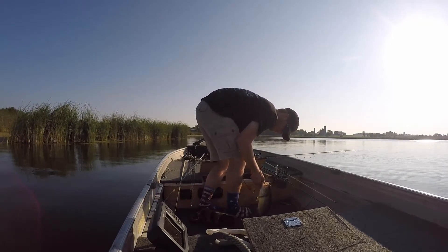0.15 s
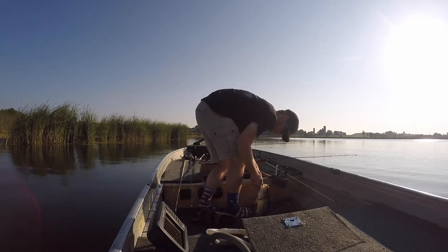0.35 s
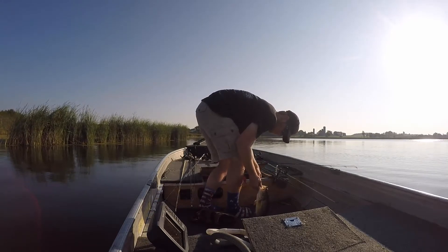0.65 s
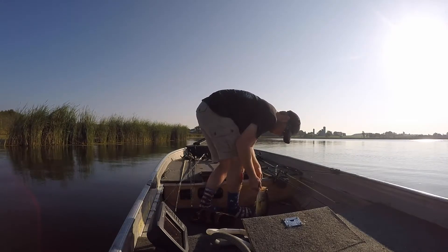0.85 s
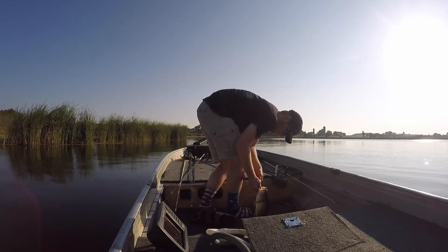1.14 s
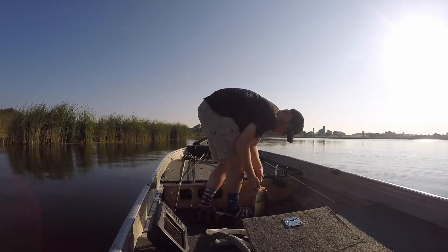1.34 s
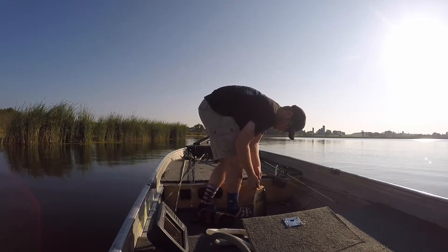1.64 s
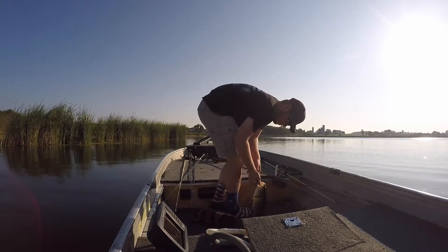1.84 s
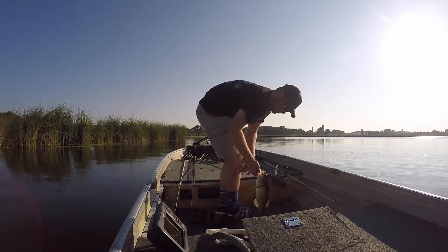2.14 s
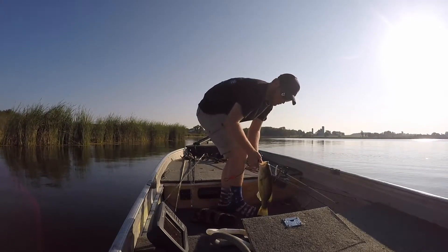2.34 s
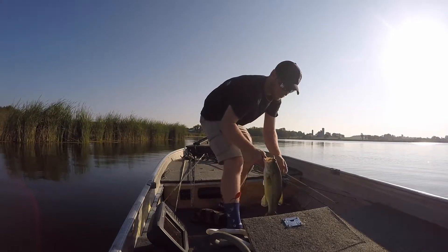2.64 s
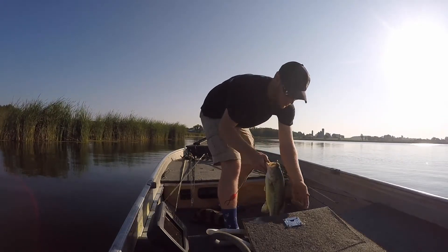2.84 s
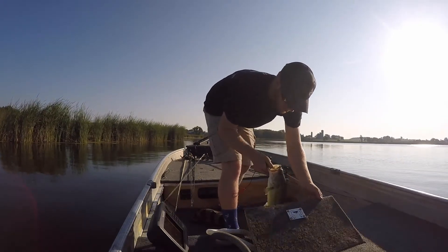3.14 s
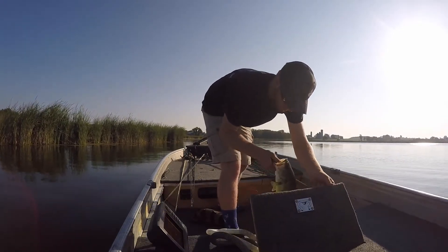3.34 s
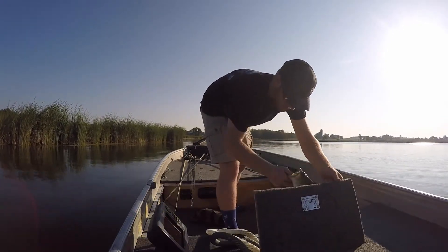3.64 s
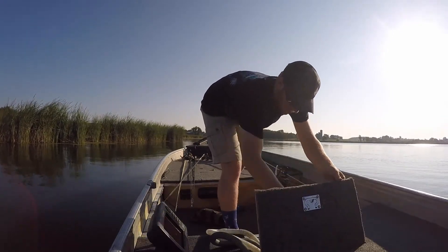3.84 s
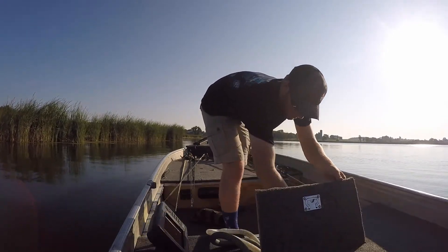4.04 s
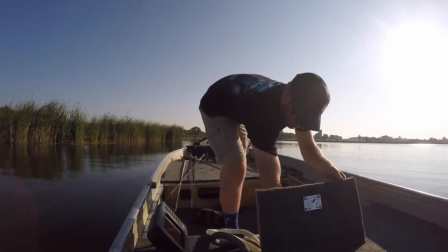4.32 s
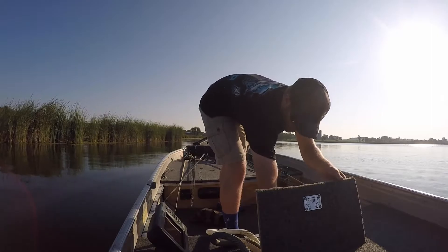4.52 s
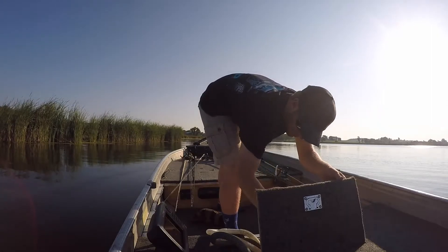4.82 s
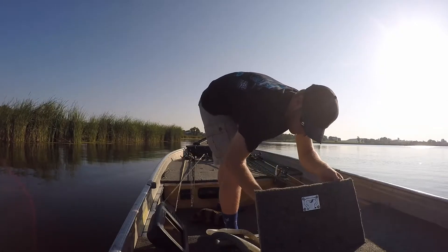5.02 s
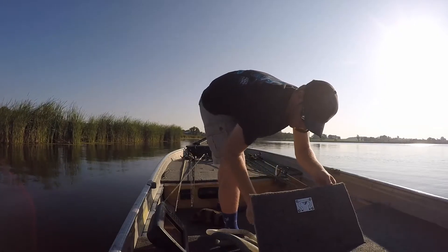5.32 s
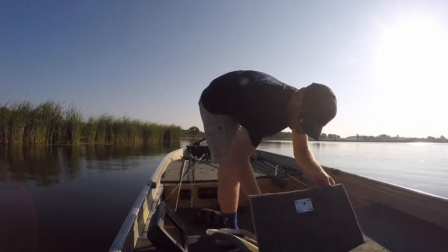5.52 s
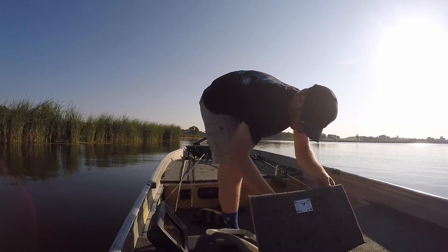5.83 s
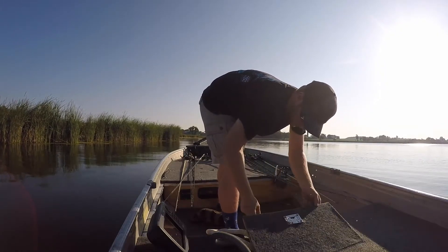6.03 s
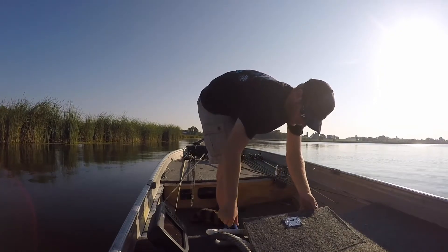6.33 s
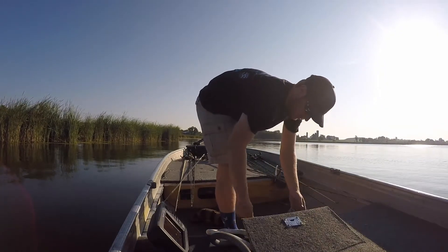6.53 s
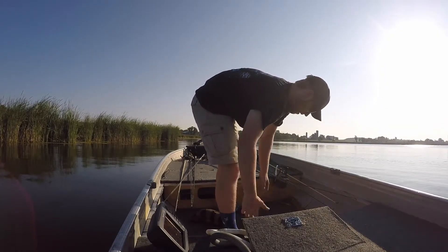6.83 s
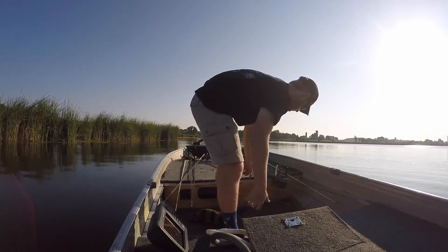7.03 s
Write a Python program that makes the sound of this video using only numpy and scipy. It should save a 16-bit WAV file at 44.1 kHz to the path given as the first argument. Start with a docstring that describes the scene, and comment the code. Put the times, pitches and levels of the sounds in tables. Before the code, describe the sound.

On board an aluminium boat on calm water, close and mono, with a low unsteady rocking rumble, soft open air, a faint low drone and slight rustling. At 1.0 s comes the loudest event: a hard bang with a bright metallic clack, ringing plates and a deep hull boom, then boards thudding back in quick weakening bounces and small ticks until about 1.3 s. It stays quiet until 2.8 s, with faint touches, then dull booming bumps at 3.0 s as the hatch is lifted, and a watery plop at 3.25 s. From 3.9 to 5.3 s: rustles, faint taps, tiny bubbles. At 5.7 s, plops and a brief rough hinge groan, dipping then gliding up until 6.0 s. The hatch drops at 6.1 s with a heavy, duller slam, bouncing boards and coarse scraping to about 6.5 s; soft knocks, a plop at 6.77 s and rustling finish by 7.2 s.

```python
"""Heavy blows bang and bounce on the floor of an aluminium boat on calm water, close by and in mono: each clacks,
rings the plates and booms in the hull, as sums of decaying modes and noise bursts; slams set deck boards thudding.
A deck hatch is lifted, groans on its hinge (a gliding tone), scrapes (shifting noise) and drops shut.
Small parts tick; water plops in the well below (rising sines). Behind lie the low rumble of the rocking boat,
soft open air, a faint drone, and the rustle and small drips of movement on deck."""
import sys
import numpy as np
from scipy import signal
from scipy.fft import rfft, irfft, next_fast_len
from scipy.io import wavfile
from scipy.ndimage import uniform_filter1d, map_coordinates

SR = 44100
rng = np.random.default_rng(int(sys.argv[2]) if len(sys.argv) > 2 else 0)


def unload_wav(signal):
    """Save mono or channel-first audio to the path in sys.argv[1] as 16-bit WAV at rate SR, clipped to [-1, 1]."""
    wavfile.write(
        sys.argv[1],
        SR,
        np.round(np.clip(np.atleast_2d(signal).T, -1, 1) * 32767).astype(np.int16),
    )


N = 316197
TIME = np.arange(N) / SR  # s, whole scene
AGE = np.arange(SR * 3 // 4) / SR  # s, since the start of one sound

# All levels are relative: each layer adds its own trim where it is mixed.
# Noise spectra of the background: [f/Hz, level/dB per Hz]
RUMBLE_SPECTRUM = [(8.8, -36), (15, 1.5), (32, 4), (51, 0), (78, -6), (135, -15), (156, -23), (177, -31.5),
                   (215, -34.5), (260, -33), (340, -53), (570, -120)]
AIR_SPECTRUM = [(120, -48), (200, 1), (300, -7), (400, -4.5), (480, -10), (620, -1.5), (700, -8.5),
                (850, 1.5), (980, -12), (1750, -21.5), (4000, -21), (8000, -29.5), (13000, -35),
                (15500, -41)]
# Resonances of the steady drone: [f/Hz, width/Hz, level/dB]
DRONE_PEAKS = [(137, 37, 18), (378, 25, 11), (584, 32, -11), (826, 10, 3.5), (930, 8.9, -21)]
# Rumble as the boat rocks: [t/s, level/dB]
ROCKING_CURVE = [(0.0, -36), (0.16, -32), (0.5, -41.5), (0.78, -34.5), (0.9, -40), (1.2, -30), (1.8, -45.5),
                 (2.12, -49.5), (3.22, -35.5), (4.27, -49), (4.61, -44.5), (5.95, -43), (6.19, -38.5),
                 (6.83, -34), (6.95, -41), (7.17, -40)]
# Movement on deck: [t/s, rustle level/dB, scrape level/dB]
MOVEMENT_CURVE = [(0, -71, -62), (.95, -64.5, -57.5), (1.6, -67, -62), (2, -62.5, -60.5), (2.5, -66.5, -61),
                  (2.8, -59.5, -55.5), (3.2, -60.5, -55), (3.5, -72, -58.5), (3.9, -57.5, -61),
                  (4.65, -66, -61), (4.9, -55, -59.5), (5.15, -66.5, -57), (5.62, -64, -59),
                  (5.78, -56.5, -55.5), (6.07, -50.5, -39.5), (6.22, -45.5, -40.5), (6.48, -57, -48.5),
                  (6.7, -51, -49.5), (7.17, -55, -50.5)]
# Noise spectra of cloth and shoes, and of rubbing on the deck: [f/Hz, level/dB per Hz]
RUSTLE_SPECTRUM = [(650, -40), (1200, 10), (1800, 1), (3600, -1), (5500, -7), (8000, -15), (11000, -20.5),
                   (15500, -27)]
SCRAPE_SPECTRUM = [(76, -12.5), (130, -3), (254, -11), (345, -8.5), (459, -16.5), (513, -12), (610, -16),
                   (874, -13.5), (989, -16.5), (2500, -31.5), (3250, -81), (5500, -120)]
# Strength of small bubbles by pitch: [f/Hz, level/dB]
DRIP_STRENGTH = [(300, 0), (700, -13), (1500, 2), (3200, 10), (5000, -9), (9000, -8)]
# Loudest bubbles and drips in the well and along the hull: [t/s, starting f/Hz, level/dB]
PLOP_EVENTS = [(3.255, 634, -34.5), (3.257, 1294, -39), (3.957, 2520, -41), (3.966, 837, -32.5),
               (4.248, 4470, -35), (4.251, 339, -30), (4.496, 2650, -42.5), (4.834, 178, -37),
               (4.996, 366, -37.5), (5.234, 3100, -42), (5.7, 324, -24), (5.701, 2280, -32),
               (5.727, 2640, -40), (6.556, 528, -36.5), (6.658, 880, -38), (6.768, 1197, -29.5),
               (7.064, 542, -37)]
# Hinge groan as the hatch is lowered: [t/s, mean f/Hz, level/dB]
GROAN_CURVE = [(5.71, 289.6, -64), (5.735, 249, -42), (5.765, 236, -39), (5.80, 303, -56), (5.85, 303, -47),
               (5.885, 333, -40.5), (5.935, 415, -58), (5.96, 555, -44), (5.985, 566, -67)]
# Light ticks of loose tackle and the latch: [t/s, level/dB]
TICK_EVENTS = [(0.9942, -42), (1.057, -36), (1.087, -36), (1.124, -41), (1.321, -52.5), (1.349, -47.5),
               (1.3751, -47), (1.428, -48.5), (1.769, -52), (2.628, -54.5), (4.896, -47), (5.234, -51),
               (6.1195, -28), (6.72, -39.5)]
# Noise spectra of a tick, and of a blow's clack, first touch, knock and thump: [f/Hz, level/dB per Hz]
TICK_SPECTRUM = [(600, -24), (2000, -3.5), (3500, 0.5), (5500, -3), (8000, -10), (11000, -17), (15500, -27)]
CLACK_SPECTRUM = [(300, -49), (900, -8), (1600, 1), (2500, -5), (4200, 1), (5500, -11.5), (7500, -21),
                  (11000, -54.5), (15500, -38)]
CRACK_SPECTRUM = [(700, -19), (1600, -13), (2800, 14), (4000, -6), (5200, -8), (7000, -18), (10000, -46),
                  (15500, -38)]
KNOCK_SPECTRUM = [(200, -29), (380, 0), (560, 4.5), (700, 4.5), (830, 6.5), (1080, 0.5), (1400, -4.5),
                  (3000, -8), (8000, -65)]
THUMP_SPECTRUM = [(60, -21), (120, 6), (180, 3.5), (260, -3.5), (350, -7), (500, -13.5), (1500, -54)]
# Ringing modes of the metal fittings, plates and hollow hull: [f/Hz, level/dB, t60/s]
FITTING_MODES = [(1483, 7, 0.11), (1780, -1, .18), (1938, 5, 0.11), (2287, -19, 0.3), (2510, 9, 0.057),
                 (2750, -1, 0.23), (3100, -7.5, 0.11), (3280, 8, 0.084), (4030, -34, 0.16),
                 (4240, -47, 0.059), (4680, -5, 0.15), (4700, -13, 0.41), (5170, -3, 0.18),
                 (5880, -9, 0.25)]
PLATE_MODES = [(235.2, 3.5, 0.25), (282, -6.5, 0.62), (352.5, 3.5, 0.22), (416, -14, 0.59),
               (522.5, -5, 0.36), (545, -4, 0.27), (632, -8, 0.38), (816, -2, 0.19), (923, -11, 0.51),
               (1075, 4.5, 0.092), (1083, -6, 0.1), (1189, -2, 0.13)]
HULL_MODES = [(38.7, -1.5, 0.12), (71.6, -2, 0.21), (80.9, -1.5, 0.35), (105, -9.5, 0.13),
              (118.7, -20, 0.25), (177, -7.5, 0.51)]
# Harder contact booms higher: [clack level over boom/dB, boom centre f/Hz]
CONTACT_HARDNESS = [(-27, 46), (-7, 76), (8, 220)]
# Blows on the hull: [t/s, metal clack/dB, plate knock/dB, floor thump/dB, hull boom/dB]
BLOW_EVENTS = [(1.014, -22, -29, -33, -9.5), (1.0211, -13, -18.5, -12.5, -1.5),
               (1.0548, -40, -51, -19, -20), (1.0713, -52, -44, -34, -7), (1.0859, -41, -40, -37, -34),
               (1.1362, -32.5, -58, -33, -22), (1.1799, -33.5, -38, -28.5, -29),
               (1.736, -43, -48, -51, -60), (2.797, -40, -46.5, -48, -55), (2.897, -60, -53, -67, -41),
               (3.0097, -35, -38.5, -50, -14.5), (3.0263, -31, -34.5, -32.5, -13),
               (3.053, -36.5, -48, -36, -20), (3.256, -55, -49.5, -40, -51),
               (3.3026, -47.5, -49.5, -58, -41), (3.352, -56, -67, -58, -17),
               (3.9585, -44.5, -52, -60, -59), (4.016, -41.5, -46.5, -67, -54),
               (4.249, -42, -45, -43.5, -52), (4.7628, -42, -54, -60, -62), (5.699, -40.5, -44, -43, -51),
               (5.7301, -37.5, -62, -54, -42), (5.874, -40, -65, -55, -58), (6.0741, -36, -39, -31, -34),
               (6.1019, -34, -25.5, -29, -26), (6.12, -23, -18.5, -18.5, -2.5),
               (6.2036, -31, -32, -36, -26), (6.2737, -42.5, -35, -34, -16), (6.588, -51, -41, -36, -29),
               (6.652, -45, -52, -36.5, -26), (6.7226, -30.5, -33.5, -38, -40),
               (6.835, -58, -40.5, -28.5, -20.5), (7.0917, -66, -47.5, -40, -41)]

TOP_HZ = 15600
RUMBLE_DB = 4  # over the rocking curve
PLOP_T60_S, PLOP_SIZE_LAW = .066, .55  # ring time at 1 kHz; bigger bubbles ring longer by this power
PLOP_RISE, PLOP_JITTER = 3.6, 0.074  # octaves per second, octaves
PLOP_DIRECT_DB, PLOP_WALLS_DB = -0.5, -6  # straight from the water, off the walls of the well
GROAN_ROUGH, GROAN_OVERTONE_DB = 0.013, -28  # pitch unsteadiness (share), second harmonic
TACKLE_DB, TACKLE_TOP_DB = -7.5, -27  # tackle tick relative to the clack, its upper limit before tick trim
SLAM_DB = -22  # a knock above this makes the deck boards jump
JUMP_S, JUMP_HZ = .024, 130  # mean spacing, boom centre
JUMP_DB, JUMP_LOSS_DB = -10, 2  # first thud relative to the blow's thump, loss per jump


def amp(db):
    """Decibels to gain."""
    return 10 ** (np.asarray(db) / 20)


def unit(x):
    """Scale to rms 1."""
    return x / np.sqrt(np.mean(x ** 2) + 1e-20)


def fade(t60):
    """Exponential decay, 60 dB down after t60 seconds."""
    return np.exp(-np.log(1000) * AGE / max(t60, 1e-3))


def curves(rows):
    """One value per sample for each column after the time."""
    s, *columns = np.transpose(rows)
    return [np.interp(TIME, s, column) for column in columns]


def wobble(rate):
    """A smooth random curve, rate knots a second."""
    knots = rng.standard_normal(int(N * rate / SR) + 4)
    return map_coordinates(knots, [TIME * rate])


def filtered(x, response):
    """x times a complex response of frequency."""
    size = next_fast_len(len(x) + 8192)
    spectrum = rfft(x, size) * response(np.fft.rfftfreq(size, 1 / SR))
    return irfft(spectrum, size)[:len(x)]


def coloured(x, spectrum):
    """x shaped by a [f/Hz, level/dB] spectrum, at rms 1."""
    f, db = np.transpose(spectrum)
    return unit(filtered(x, lambda hz: amp(np.interp(np.log(hz + 1), np.log(f), db))))


def add(track, s, sound):
    """Mix a sound in at time s."""
    room = track[round(s * SR):][:len(sound)]
    room += sound[:len(room)]


def background():
    """The rocking hull rumbles under soft open air and a faint drone of broad resonances."""
    rumble_db = curves(ROCKING_CURVE)[0] + RUMBLE_DB + 1.6 * wobble(4)
    rumble = coloured(rng.standard_normal(N), RUMBLE_SPECTRUM) * amp(rumble_db)
    air = amp(-57) * coloured(rng.standard_normal(N), AIR_SPECTRUM)

    def resonances(f):
        """Sum of the drone's band-pass peaks."""
        return sum(amp(db) * 1j * f * width / (centre ** 2 - f * f + 1j * f * width)
                   for centre, width, db in DRONE_PEAKS)

    drone = amp(-59.0) * unit(filtered(rng.standard_normal(N), resonances))
    return rumble + air + drone


def drips(loudness_db, per_second, size_db):
    """Stirred water pops small bubbles at random pitches that rise; small ones ring briefly."""
    track = np.zeros(N)
    age = AGE[:SR // 10]
    pitch_hz, pitch_db = np.transpose(DRIP_STRENGTH)
    for when, pitch, size, life in rng.random((round(per_second * N / SR), 4)):
        hz = 400 * 20 ** (pitch ** .7)
        strength_db = np.interp(np.log(hz), np.log(pitch_hz), pitch_db)
        db = loudness_db[int(when * N)] + size_db * size ** 3 + strength_db
        decay = 0.0029 * (.5 + life) * np.sqrt(2000 / hz)
        tone = np.sin(2 * np.pi * hz * age * (1 + 0.98 * life * age))
        shape = np.exp(-age / decay) * (1 - np.exp(-age / 0.0023))
        add(track, when * N / SR, amp(db) * tone * shape)
    return track


def patchy(depth_db):
    """Noise whose colour shifts from moment to moment, as the rubbing contact moves."""
    z = signal.stft(rng.standard_normal(N), nperseg=512)[2]
    field = uniform_filter1d(rng.standard_normal(z.shape), size=5, axis=0)  # smooth over frequency
    field = uniform_filter1d(field, size=4, axis=1)  # and over time
    return signal.istft(z * amp(depth_db * unit(field)), nperseg=512)[1][:N]


def scuffs():
    """Cloth and grit catch and slip in brief scratches, each with its own colour."""
    track = np.zeros(N)
    age = AGE[:SR // 16]
    for when, pitch, size, life in rng.random((round(55 * N / SR), 4)):  # 55 a second
        hz = 1500 * 5 ** pitch
        scratch = signal.lfilter(*signal.iirpeak(hz, 3.5, fs=SR), rng.standard_normal(len(age)))
        slip = age / (.002 + .005 * life)
        add(track, when * N / SR, amp(6 * size ** 2) * scratch * slip * np.exp(-slip))
    return unit(track)


def movement():
    """Clothes rustle, shoes and the carpeted hatch rub on the deck, and the moving boat stirs the water."""
    rustle_db, scrape_db = curves(MOVEMENT_CURVE)
    share = np.interp(rustle_db, [-64, -54], [.6, .2])  # brisk rubbing blurs the scratches
    friction = np.sqrt(share) * scuffs() + np.sqrt(1 - share) * unit(patchy(depth_db=5.0))
    rustle = coloured(friction, RUSTLE_SPECTRUM) * amp(rustle_db - 0.5 + 0.8 * wobble(21))
    scrape = coloured(patchy(depth_db=4.0), SCRAPE_SPECTRUM) * amp(scrape_db + 2.0 + 0.94 * wobble(30))
    water = drips(np.minimum(rustle_db, -57) + 2, per_second=60, size_db=13)
    return rustle + scrape + water


def plops():
    """Trapped air rings in the water, its pitch rising; close walls blur each note."""
    track = np.zeros(N)
    for s, hz, db in PLOP_EVENTS:
        t60 = PLOP_T60_S * (1000 / hz) ** PLOP_SIZE_LAW
        jitter = np.interp(AGE, np.linspace(0, AGE[-1], num=260), rng.standard_normal(260))
        pitch = hz * 2 ** (PLOP_RISE * np.minimum(AGE, t60) + PLOP_JITTER * jitter)
        shape = fade(t60) * (1 - np.exp(-AGE / 0.0024))
        note = np.sin(2 * np.pi * np.cumsum(pitch) / SR) * shape
        walls = rng.standard_normal(len(AGE)) * fade(0.061)
        blur = signal.fftconvolve(note, walls / np.linalg.norm(walls))[:len(AGE)]
        add(track, s, amp(db) * (amp(PLOP_DIRECT_DB) * note + amp(PLOP_WALLS_DB) * blur))
    return track


def groan():
    """The hinge sticks and slips; the rough tone dips, then climbs as the hatch gathers speed."""
    hz, db = curves(GROAN_CURVE)
    phase = 2 * np.pi * np.cumsum(hz * (1 + GROAN_ROUGH * wobble(150))) / SR
    turning = (TIME > GROAN_CURVE[0][0]) & (TIME < GROAN_CURVE[-1][0])
    tone = np.sin(phase) + amp(GROAN_OVERTONE_DB) * np.sin(2 * phase)
    return turning * amp(db + 2.0 * wobble(68)) * tone


def burst(spectrum, attack, t60, tail_db, tail_t60):
    """Countless overlapping modes: a swell as waves spread, a fast decay, a weak tail from the rest of the boat."""
    shape = (1 - np.exp(-AGE / attack)) * (fade(t60) + amp(tail_db) * fade(tail_t60))
    sound = shape * coloured(rng.standard_normal(len(AGE)), spectrum)
    return sound * np.linalg.norm(shape) / np.linalg.norm(sound)  # the blow sets the energy


def ring(modes, scatter_db):
    """Distinct modes, whose strengths and signs depend on where the blow lands."""
    strength = amp(scatter_db * rng.standard_normal(len(modes))) * rng.choice([-1, 1], len(modes))
    swing = sum(gain * amp(db) * fade(t60) * np.sin(2 * np.pi * hz * AGE)
                for gain, (hz, db, t60) in zip(strength, modes))
    return swing * (1 - np.exp(-AGE / 0.0014))


def tick(db):
    """A small hard part clicks; stronger ticks chatter longer."""
    life = np.interp(db, [-55, -35], [.028, .055])
    click = burst(TICK_SPECTRUM, attack=0.00067, t60=life, tail_db=-16, tail_t60=3 * life)
    return amp(db + 0.5) * click


def ticks():
    """Small hard parts click, some alone and some along with a blow."""
    track = np.zeros(N)
    for s, db in TICK_EVENTS:
        add(track, s, tick(db))
    return track


def clack(clack_db):
    """Metal fittings chatter and ring after a sharp first touch; hard blows keep loose parts going longer."""
    rattle = np.interp(clack_db, [-45, -15], [.032, .075])
    chatter = burst(CLACK_SPECTRUM, attack=0.00094, t60=rattle, tail_db=-20.5, tail_t60=2.4 * rattle)
    fittings = amp(-18.5) * ring(FITTING_MODES, scatter_db=-0.5)
    touch = burst(CRACK_SPECTRUM, attack=0.00075, t60=0.012, tail_db=-33, tail_t60=.05)
    return chatter + fittings + amp(-0.5) * touch


def knock():
    """The plates of the hull ring, in distinct modes over a dense burst."""
    dense = burst(KNOCK_SPECTRUM, attack=0.00055, t60=0.12, tail_db=-32.0, tail_t60=0.31)
    return dense + amp(-9.5) * ring(PLATE_MODES, scatter_db=5.0)


def thump():
    """The dull answer of the floor."""
    return burst(THUMP_SPECTRUM, attack=0.0028, t60=0.16, tail_db=-27.0, tail_t60=0.72)


def boom(centre_hz, octaves):
    """A push on the hull favours the modes whose period matches its contact time."""
    swing = np.zeros(len(AGE))
    for hz, db, t60 in HULL_MODES:
        favour = 1 / (1 + (np.log2(hz / centre_hz) / octaves) ** 2)
        swing -= favour * amp(db) * fade(t60) * np.sin(2 * np.pi * hz * AGE)
    return swing * (1 - np.exp(-AGE / 0.0054))


def jumping_boards(count):
    """After a slam the loose deck boards thud back count times, unevenly and ever more weakly."""
    track = np.zeros(N)
    for s, _, knock_db, thump_db, _ in BLOW_EVENTS:
        if knock_db > SLAM_DB:
            for k, late in enumerate(rng.uniform(-0.3064, 0.295, count)):
                thud = thump() + amp(-13.5) * knock() + amp(-3.5) * boom(JUMP_HZ, octaves=0.83)
                thud_db = thump_db + JUMP_DB - JUMP_LOSS_DB * k
                add(track, s + JUMP_S * (k + 1 + late), amp(thud_db) * thud)
    return track


def blows():
    """Each contact clacks on metal, knocks and thumps through the plates and pushes the whole hull."""
    track = np.zeros(N)
    for s, clack_db, knock_db, thump_db, boom_db in BLOW_EVENTS:
        tackle = tick(min(clack_db + TACKLE_DB, TACKLE_TOP_DB))
        metal = amp(clack_db - 1.5) * clack(clack_db)
        add(track, s, metal + amp(knock_db) * knock() + amp(thump_db) * thump() + tackle)
        centre_hz = np.interp(clack_db - boom_db, *np.transpose(CONTACT_HARDNESS))
        hull = amp(boom_db) * boom(centre_hz, octaves=0.42)
        add(track, s + 0.00423, hull)  # the heavy hull moves a moment later
    return track


def scene():
    """Everything aboard, mixed to one channel."""
    surroundings = background() + movement() + plops()
    hatch_and_tackle = groan() + ticks()
    return (surroundings + hatch_and_tackle + jumping_boards(count=8) + blows())[None]


def record(dry):
    """The microphone channel passes nothing at or above its band limit."""
    return filtered(dry[0], lambda hz: hz < TOP_HZ)[None]


dry = scene()
out = record(dry)
unload_wav(out)
```